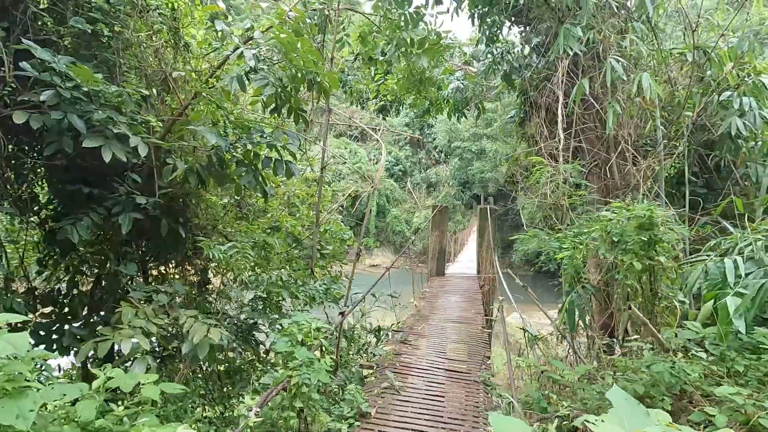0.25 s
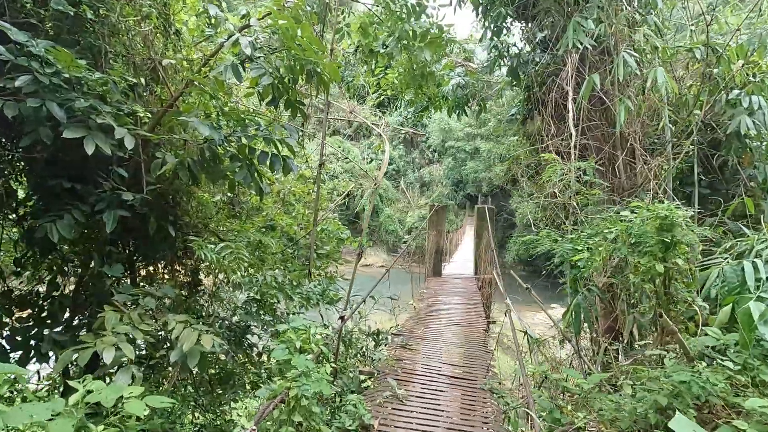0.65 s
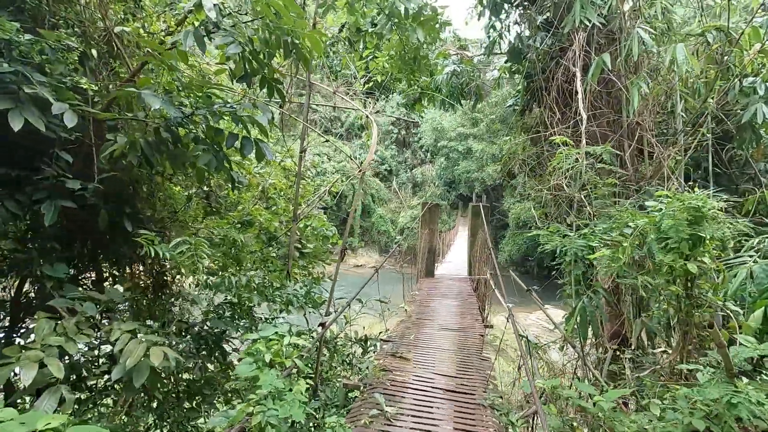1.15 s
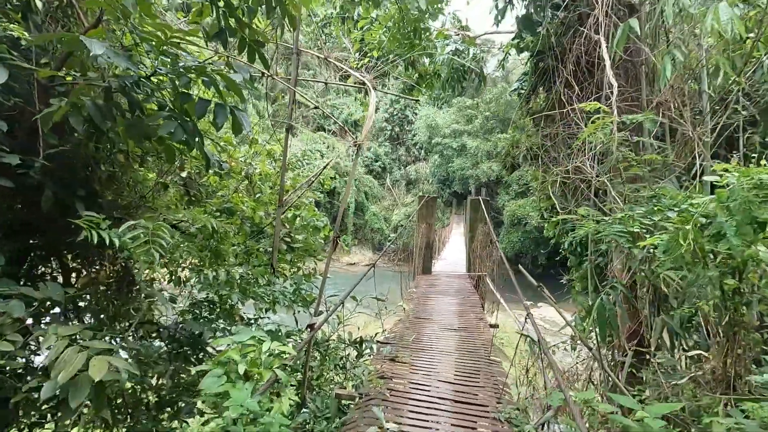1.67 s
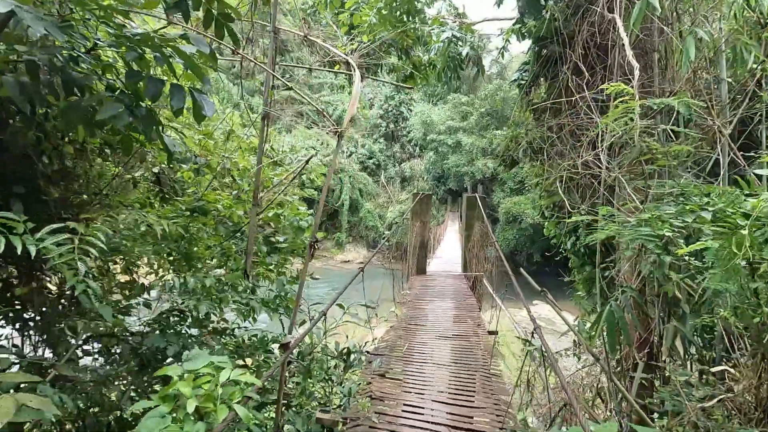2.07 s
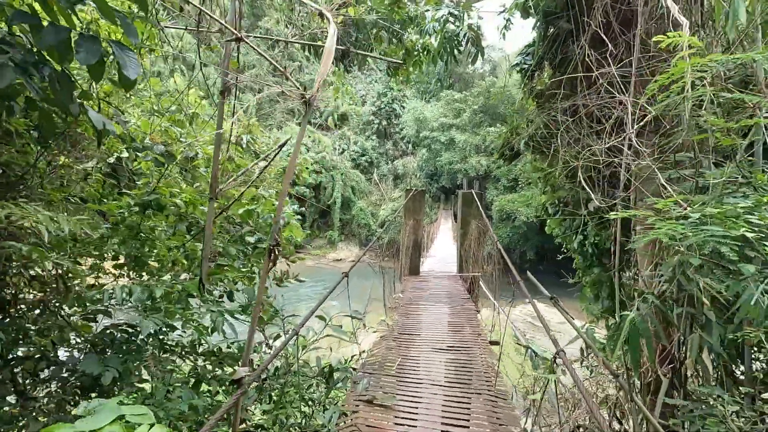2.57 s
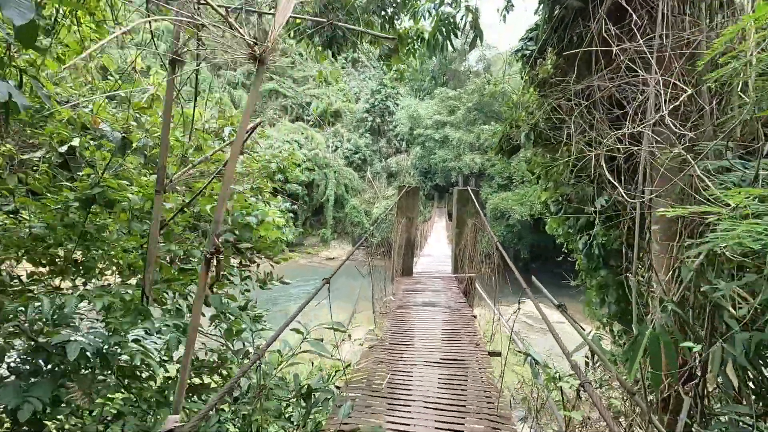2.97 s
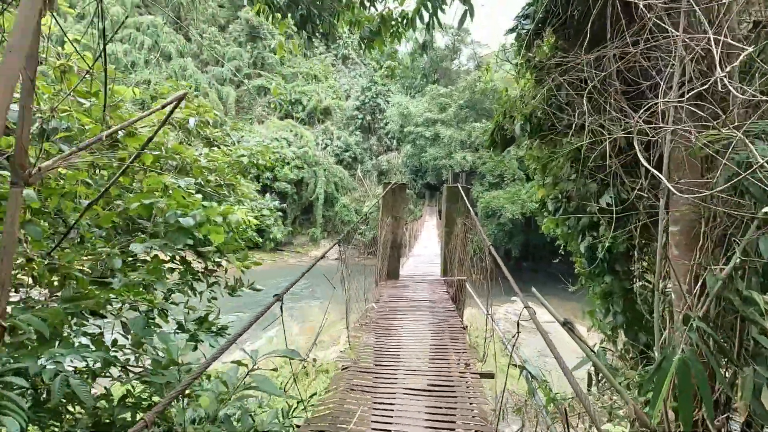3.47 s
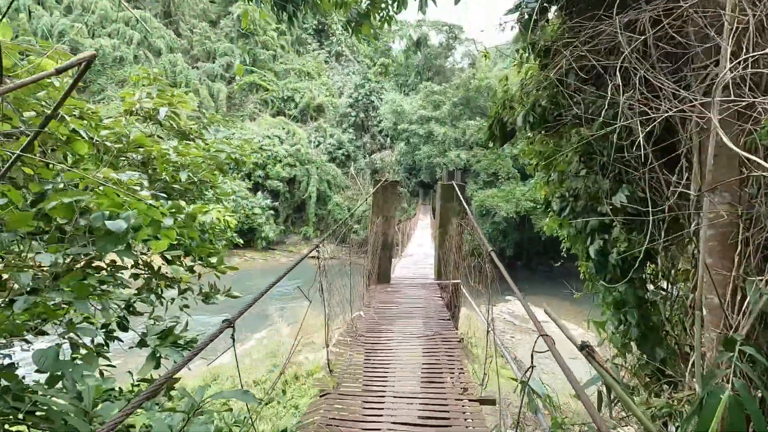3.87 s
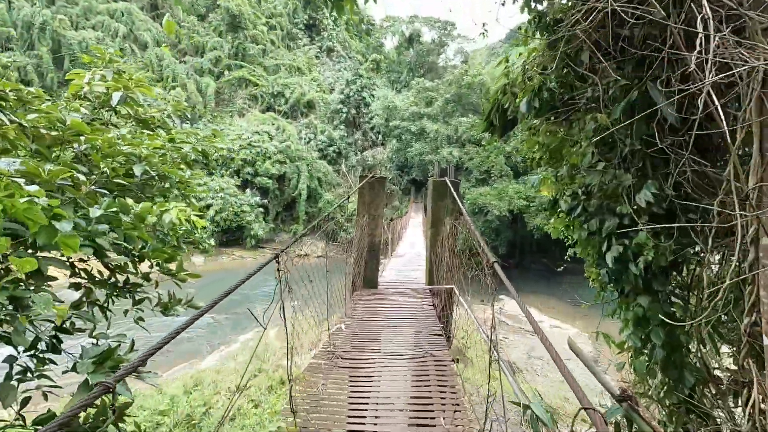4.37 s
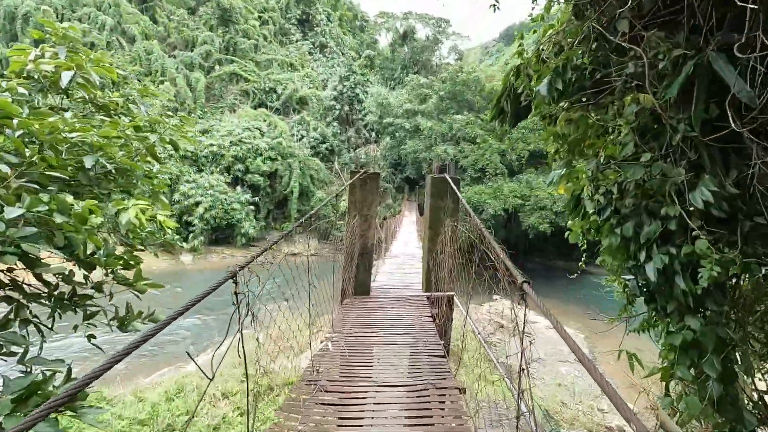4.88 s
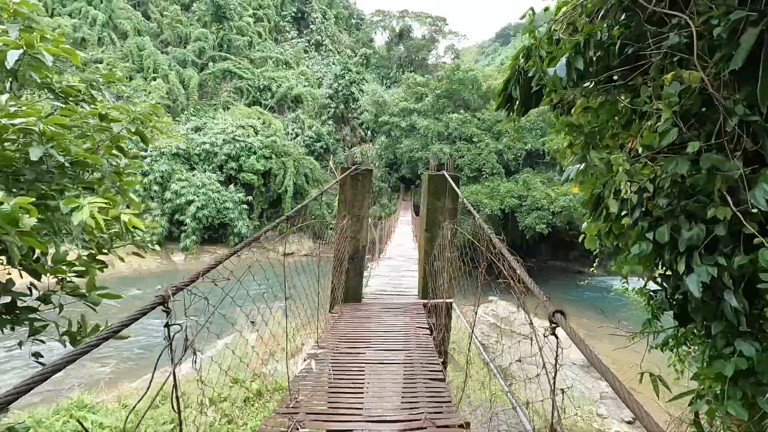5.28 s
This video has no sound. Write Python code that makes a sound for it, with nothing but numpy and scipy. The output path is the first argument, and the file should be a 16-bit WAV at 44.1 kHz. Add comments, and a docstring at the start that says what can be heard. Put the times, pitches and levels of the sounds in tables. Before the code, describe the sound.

A broad, bubbling river rush fills the air, slightly stronger at the start and brighter as the foliage opens. Close to the microphone, a walker crushes dry leaves, snaps sticks and raps a ringing slat, loudest just after three seconds, with scattered steps to the end. Tiny thin chirps sit far above; the image is narrow, with only the faintest treble hiss wide.

```python
"""A rocky river rushes below a wooden suspension bridge, heard from the path that leads down to it.
Shaped noise and ringing bubbles make its rumble, churn, wash and spray, brighter as the leaves thin out.
Close to the microphone, footsteps knock ringing slats, crunch dry litter and crack sticks; a twig ticks.
Three thin chips, unsteady sine whistles, come from far up in the trees, over a faint high noise hiss.
The picture is nearly mono but for the highest treble."""
import sys
import numpy as np
from scipy import signal
from scipy.fft import rfft, irfft, next_fast_len
from scipy.io import wavfile
from scipy.ndimage import uniform_filter1d, map_coordinates

SR = 44100
rng = np.random.default_rng(int(sys.argv[2]) if len(sys.argv) > 2 else 0)


def put_to_file(sound):
    """Save the sound as 16-bit audio at rate SR, in the file named by the first command-line argument."""
    columns = np.atleast_2d(sound).T  # one column per channel
    safe = np.clip(columns, -1, 1)
    whole_steps = np.round(safe * 32767)
    wavfile.write(sys.argv[1], SR, whole_steps.astype(np.int16))


N = 243873

# Loudness of the river along the path. Each row: time in seconds, level of the wash in dB.
RIVER_LEVEL = [(0.15, -30), (0.6, -27.5), (1.25, -32.5), (1.8, -33.5), (3.0, -33), (3.55, -32.5),
               (3.95, -33.5), (5.53, -32)]
# Colour of the deep rumble. Each row: frequency in Hz, relative level in dB per Hz.
RUMBLE_SPECTRUM = [(8, -42), (25, -6), (42, -2), (75, 0.5), (125, -4), (170, -10), (300, -32.5),
                   (1500, -120)]
# Colour of the churning pools. Each row: frequency in Hz, relative level in dB per Hz.
CHURN_SPECTRUM = [(20, -74), (90, -12), (160, 0), (220, 1), (295, -4.5), (380, -9.5), (520, -10.5),
                  (1000, -57), (4000, -120)]
# Colour of the hollow note in the water. Each row: frequency in Hz, relative level in dB per Hz.
HOLLOW_SPECTRUM = [(100, -78), (290, -9), (335, 3.5), (390, 3), (480, -4), (1500, -95)]
# Colour of the bubbling wash. Each row: frequency in Hz, relative level in dB per Hz.
WASH_SPECTRUM = [(30, -70), (200, -33), (400, -5.5), (620, 0), (850, 1), (1300, -3.5), (2000, -9),
                 (2800, -14.5), (4000, -26), (8000, -59), (12000, -120)]
# Colour of the fine spray. Each row: frequency in Hz, relative level in dB per Hz.
SPRAY_SPECTRUM = [(200, -70), (1200, -25), (2200, -2), (3000, 6.5), (4100, -0.5), (5500, -2), (7100, -5.5),
                  (8000, -14), (9000, -23), (10000, -19.5), (11300, -27), (16000, -62)]
# Footfalls. Each row: start in seconds, strength in dB, time the sole takes to roll down in seconds,
# brittle snap against the strength in dB, pitch of the crack in Hz.
FOOTFALLS = [ (0.153, -29.5, 0.048, -38, 4200), (2.123, -41, 0.017, -16, 5900),
             (2.649, -27.5, 0.015, -17.5, 5600), (3.149, -23.5, 0.0045, -24, 2820),
             (3.273, -33.5, .017, -10.5, 6200), (3.527, -40.5, 0.061, -18, 6000),
             (4.412, -29.5, .11, -19, 3330), (4.651, -31, 0.0065, -23.5, 4100),
             (4.735, -39.5, 0.026, -29.5, 3400), (5.17, -34.5, .026, -12, 5960),
             (5.272, -36.5, 0.032, -21, 6200), ]
# Colour of crushed litter. Each row: frequency in Hz, relative level in dB per Hz.
CRUNCH_SPECTRUM = [(50, -50), (300, 9), (800, 11), (1700, 7), (2700, 6), (4200, -3), (5600, -8.5),
                   (7100, -8), (8300, -22), (10500, -27), (15000, -60)]
# Colour of the brittle snapping. Each row: frequency in Hz, relative level in dB per Hz.
SNAP_SPECTRUM = [(500, -56), (2500, -37), (5500, -2), (7200, -6), (8600, -17), (11200, -2), (12200, 17),
                 (13300, 4), (15500, 4)]
# Ringing modes of a wooden slat. Each row: frequency in Hz, level in dB, time to fall 60 dB in seconds.
SLAT_MODES = [(356, 1.5, 0.095), (1210, -21, .1), (1670, -4, 0.12), (1880, -34, 0.06), (2560, -20, 0.074),
              (3320, -17, 0.044), (4900, -25, 0.12), (5770, -10, 0.11), (7300, -22, 0.14)]
# Chips in the trees. Each row: start in seconds, pitch in Hz, level in dB, length in seconds.
CHIP_CALLS = [(2.784, 8045, -51, .052), (3.19, 8040, -51, 0.063), (3.402, 10770, -58, .05)]
# Colour of the very high hiss. Each row: frequency in Hz, relative level in dB per Hz.
FIZZ_SPECTRUM = [(8000, -90), (11300, -12), (11800, -5), (12250, 0), (12700, -6), (13200, -9), (15000, -15),
                 (15700, -26)]
# Opening fade of the whole sound. Each row: time in seconds, gain in dB.
FADE_IN = [(0, -71), (.045, -59), (.065, -16.5), (.09, -5), (.125, 0)]

# River: levels in dB against the wash, then how far each layer follows its swings (1 = equally)
RUMBLE_DB, CHURN_DB, SPRAY_DB = 6.5, 0.9, -15.5
RUMBLE_FOLLOWS, SPRAY_FOLLOWS = 0.85, 1.19
# The leaves thin out and let more spray through; the churning grows as the bank opens
CLEARING_S, CLEARING_TAKES_S, CLEARING_DB = 2.5, 0.6, 2
POOLS_S, POOLS_TAKES_S, POOLS_DB = 3.86, 0.34, 2.5
# A hollow note swells and passes: peak time, peak level, loss per tenfold distance in time, half width
HOLLOW_S, HOLLOW_DB, HOLLOW_FADE_DB, HOLLOW_WIDTH_S = 3.6, -35, 10.5, 0.41

# Steps: the weight comes on over a share of the roll and holds for the rest
RISE_SHARE = .25
STEP_T60_S, T60_PER_ROLL = 0.35, 4.9  # a slow roll also dies away slowly
BRISK_S = 0.0051  # the roll of a brisk step
KNOCK_DB, CRACK_DB = -5.5, -6.5  # against the strength, for a brisk step
SOFTEN_DB = 6  # knock and crack lose this much in a step ten times slower
TWIG_S, TWIG_DB, TWIG_HZ, TWIG_T60_S = .235, -30, 3640, 0.055

# The high hiss comes up from almost nothing, while its full level keeps growing slowly
FIZZ_S, FIZZ_TAKES_S, FIZZ_DEPTH_DB = 0.9, 0.43, 24
FIZZ_DB, FIZZ_DB_PER_S = -67.5, 1.46  # full level at 0 s and its growth
TOP_HZ = 15600  # nothing sounds from here up


def river():
    """Water plunges between rocks: a low rumble, churning pools, a wash of bubbles and fine spray."""
    wash_db, = curves(RIVER_LEVEL)
    usual_db = wash_db.mean()
    swing_db = wash_db - usual_db
    rumble_db = usual_db + RUMBLE_DB + RUMBLE_FOLLOWS * swing_db
    churn_db = wash_db + CHURN_DB + POOLS_DB * ramp(POOLS_S, POOLS_TAKES_S)
    spray_db = usual_db + SPRAY_DB + SPRAY_FOLLOWS * swing_db
    spray_db = spray_db + CLEARING_DB * ramp(CLEARING_S, CLEARING_TAKES_S)
    from_peak = (clock() - HOLLOW_S) / HOLLOW_WIDTH_S
    hollow_db = HOLLOW_DB - HOLLOW_FADE_DB * np.log10(np.hypot(1, from_peak))

    surge = wobble(5.33)  # one surge lifts wash and spray together
    rumble = amp(rumble_db + 0.32 * wobble(8.1)) * coloured(eddies(patchy_db=0.9), RUMBLE_SPECTRUM)
    churn = amp(churn_db + 1.26 * wobble(6.1)) * coloured(eddies(patchy_db=0.33), CHURN_SPECTRUM)
    hollow = amp(hollow_db) * coloured(eddies(patchy_db=0.5), HOLLOW_SPECTRUM)
    ringing = bubbles(count=6000, low_hz=443, high_hz=3467, cycles=5.4, spread_db=2.0)
    foam = eddies(patchy_db=0.38) + amp(-13) * ringing
    wash = amp(wash_db + 0.75 * surge) * coloured(foam, WASH_SPECTRUM)
    spray = amp(spray_db + 0.19 * surge) * coloured(eddies(patchy_db=0.8), SPRAY_SPECTRUM)
    return rumble + churn + hollow + wash + spray


def footsteps():
    """Each step knocks a slat, crushes dry litter and cracks a stick; the snap ends before the crunch."""
    litter = coloured(crackle(rate=1100, share=0.5), CRUNCH_SPECTRUM)
    left, right = [coloured(crackle(rate=1200, share=0.46), SNAP_SPECTRUM) for _ in range(2)]
    brittle = spread(left, right, lean_db=5)
    out = np.zeros((2, N))
    for start, db, roll, snap_db, crack_hz in FOOTFALLS:
        first = round(start * SR)
        span = slice(first, min(first + SR // 2, N))
        t = np.arange(span.stop - span.start) / SR
        rise, hold = RISE_SHARE * roll, (1 - RISE_SHARE) * roll
        t60 = STEP_T60_S + T60_PER_ROLL * roll
        impact_db = -SOFTEN_DB * np.log10(roll / BRISK_S)

        crunch = press(t, rise, hold, t60) * rattled(litter[span], t60=0.036, ring_db=-1.5)
        splitting = amp(CRACK_DB + impact_db) * crack(len(t), crack_hz, width=0.34)
        breaking = amp(snap_db) * brittle[:, span] + splitting
        snap = press(t, 0.61 * rise, 0.44 * hold, 0.5 * t60) * breaking
        knock = amp(KNOCK_DB + impact_db) * np.clip(t / rise, 0, 1) * slat(t)
        out[:, span] += amp(db) * (crunch + snap + knock)
    return out


def slat(t):
    """A struck board rings in damped modes whose balance varies from blow to blow."""
    hz, db, t60 = np.transpose(SLAT_MODES)[:, :, None]
    strength = amp(db + 2 * rng.standard_normal(db.shape) - 60 * t / t60)
    return np.sum(strength * np.sin(2 * np.pi * hz * t), axis=0)


def press(t, rise, hold, t60):
    """The weight of a foot comes on, stays a moment and dies away."""
    return np.clip(t / rise, 0, 1) * amp(-60 * np.maximum(t - rise - hold, 0) / t60)


def crackle(rate, share):
    """Tiny random fractures, rate a second, over smooth rubbing noise; share is their part of the power."""
    clicks = rng.standard_normal(N) * (rng.random(N) < rate / SR)
    share = np.clip(share, 0, 1)
    return np.sqrt(share) * unit(clicks) + np.sqrt(1 - share) * rng.standard_normal(N)


def rattled(x, t60, ring_db):
    """x plus the brief, uneven ringing of the dry sticks that it shakes, at rms 1."""
    t = np.arange(SR // 20) / SR
    ring = rng.standard_normal(len(t)) * amp(-60 * t / t60)
    shaken = signal.fftconvolve(x, ring / np.linalg.norm(ring))[:len(x)]
    return unit(x + amp(ring_db) * shaken)


def crack(count, hz, width):
    """A splitting stick: noise of rms 1 in one broad resonance, width as a share of its pitch."""
    edges = hz * np.exp(np.array([-width, width]) / 2)
    b, a = signal.butter(2, edges, "bandpass", fs=SR)
    return unit(signal.lfilter(b, a, rng.standard_normal(count)))


def twig():
    """One twig breaks on its own: a short, dry tick of resonant noise."""
    envelope = press(clock() - TWIG_S, rise=0.0011, hold=.001, t60=TWIG_T60_S)
    return amp(TWIG_DB) * envelope * crack(N, TWIG_HZ, width=0.44)


def chips():
    """Thin, short, slightly unsteady whistles far up in the trees."""
    out = np.zeros(N)
    for start, hz, db, length in CHIP_CALLS:
        progress = np.clip((clock() - start) / length, 0, 1)
        swell = np.sin(np.pi * np.sqrt(progress))  # quick to rise, slower to fall
        phase = 2 * np.pi * np.cumsum(hz * (1 + 0.0032 * wobble(300))) / SR
        out += amp(db) * swell * np.sin(phase)
    return out


def fizz():
    """A faint, very high hiss of noise that differs from ear to ear."""
    held_back_db = FIZZ_DEPTH_DB * (1 - ramp(FIZZ_S, FIZZ_TAKES_S))
    level_db = FIZZ_DB + FIZZ_DB_PER_S * clock() - held_back_db
    left, right = coloured(rng.standard_normal((2, N)), FIZZ_SPECTRUM)
    return amp(level_db) * spread(left, right, lean_db=3.5)


def eddies(patchy_db):
    """Turbulent water: white noise whose bands swell and sink on their own."""
    z = signal.stft(rng.standard_normal(N), nperseg=512)[2]
    field = uniform_filter1d(rng.standard_normal(z.shape), size=5, axis=0)  # across frequency
    field = uniform_filter1d(field, size=14, axis=1)  # along time
    return unit(signal.istft(z * amp(patchy_db * unit(field)), nperseg=512)[1][:N])


def bubbles(count, low_hz, high_hz, cycles, spread_db):
    """Damped sines of random size and pitch; each rises in pitch as its bubble nears the surface."""
    when, pitch, size = rng.random((count, 3)).T[:, :, None]
    hz = low_hz + (high_hz - low_hz) * pitch
    k = np.arange(700)  # samples of each ring
    turns = hz * k / SR
    age = turns / cycles
    tone = np.sin(2 * np.pi * turns * (1 + age / 50))
    ring = tone * np.exp(-age) * (1 - np.exp(-turns))
    loudness = amp(-spread_db * np.log(1 - .99 * size))  # a few are much louder
    grains = loudness * np.sqrt(hz) * ring
    places = (when * N).astype(int) + k
    return unit(np.bincount(places.ravel(), grains.ravel(), N)[:N])


def amp(db):
    """Decibels to gain."""
    return 10 ** (np.asarray(db) / 20)


def unit(x):
    """x at rms 1."""
    return x / np.sqrt(np.mean(x ** 2) + 1e-20)


def clock():
    """The time of every sample in seconds."""
    return np.arange(N) / SR


def curves(rows):
    """One value per sample for each column after the time."""
    s, *cols = np.transpose(rows)
    return [np.interp(clock(), s, c) for c in cols]


def ramp(start, takes):
    """0 before start, 1 once it has taken its time."""
    return np.clip((clock() - start) / takes, 0, 1)


def wobble(rate):
    """A smooth random curve, rate knots a second."""
    knots = rng.standard_normal(int(N * rate / SR) + 4)
    return map_coordinates(knots, [clock() * rate])


def filtered(x, response):
    """x times a response of frequency."""
    m = next_fast_len(N + 8192)
    return irfft(rfft(x, m) * response(np.fft.rfftfreq(m, 1 / SR)), m)[..., :N]


def coloured(x, spectrum):
    """x shaped by (Hz, dB) points on a log axis, at rms 1."""
    f, db = np.transpose(spectrum)
    return unit(filtered(x, lambda hz: amp(np.interp(np.log(hz + 1), np.log(f), db))))


def spread(left, right, lean_db):
    """Two unrelated sounds, one at each ear, leaning to the left."""
    return np.array([left * amp(lean_db / 2), right * amp(-lean_db / 2)])


def scene():
    """The river fills the air; the steps are close by."""
    return river() + footsteps() + twig() + chips() + fizz()


def record(dry):
    """The sound fades in quickly and holds nothing above the band limit."""
    fade_db, = curves(FADE_IN)
    return filtered(dry * amp(fade_db), lambda hz: hz < TOP_HZ)


dry = scene()
out = record(dry)
put_to_file(out)
```